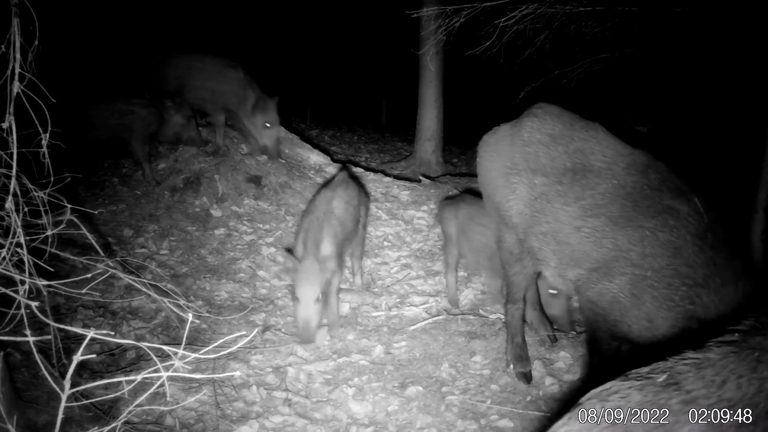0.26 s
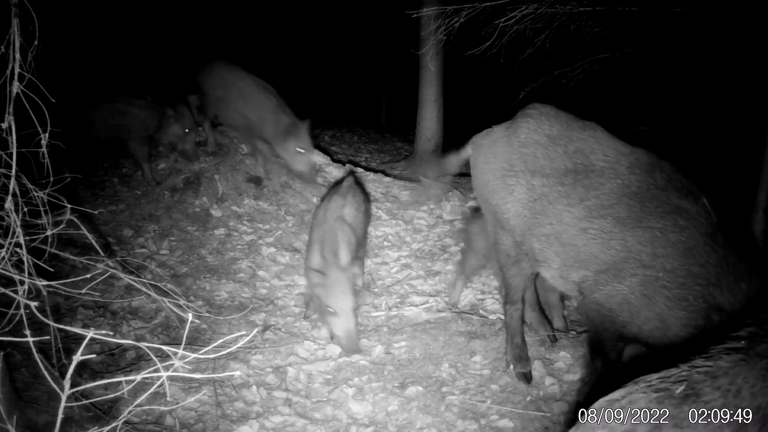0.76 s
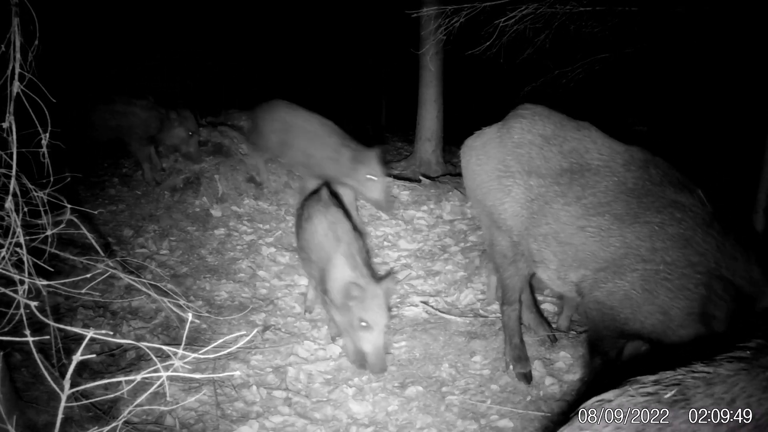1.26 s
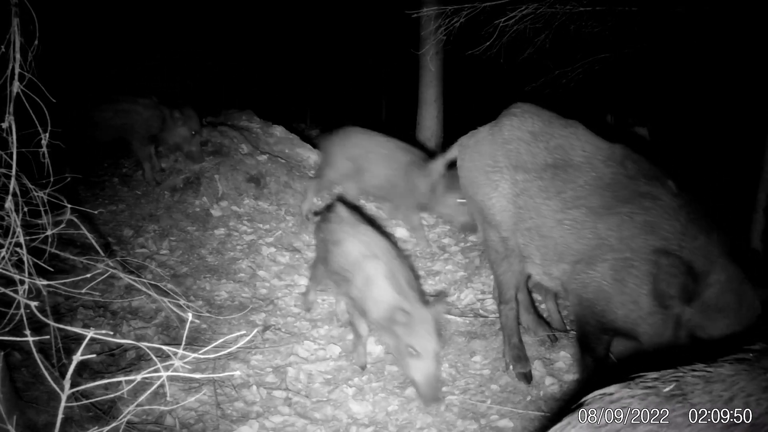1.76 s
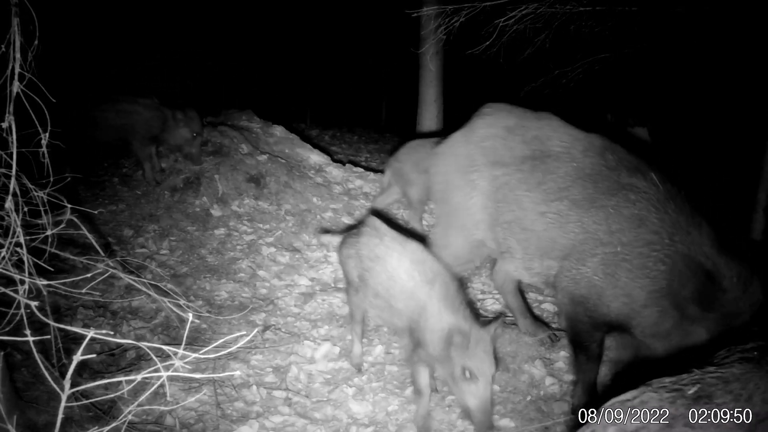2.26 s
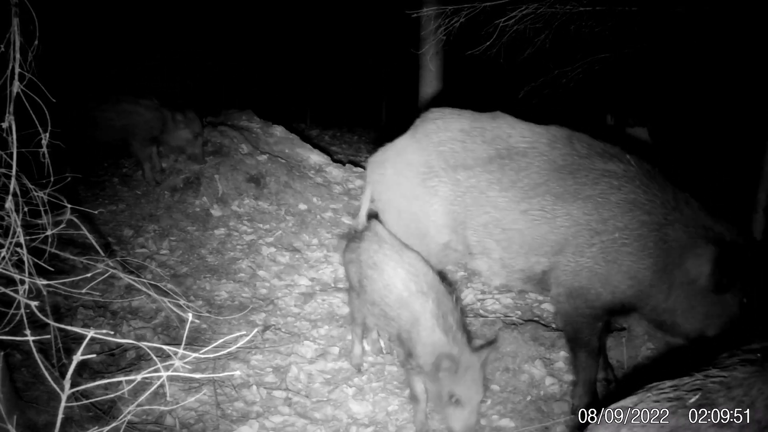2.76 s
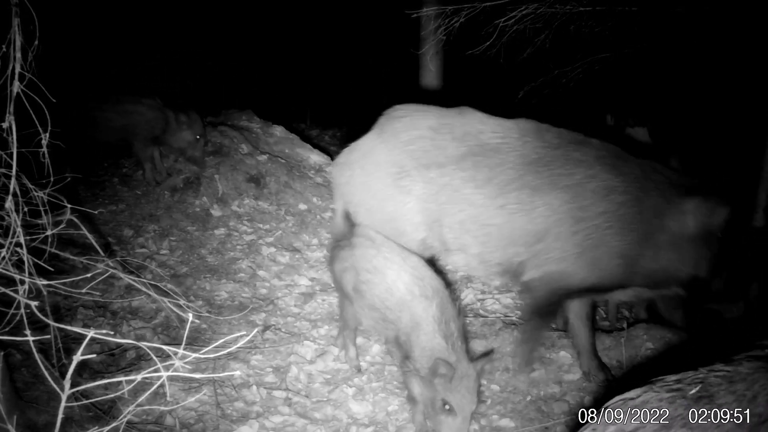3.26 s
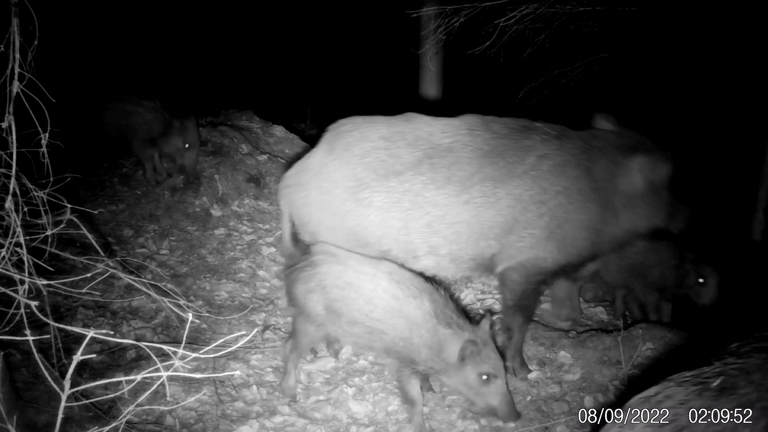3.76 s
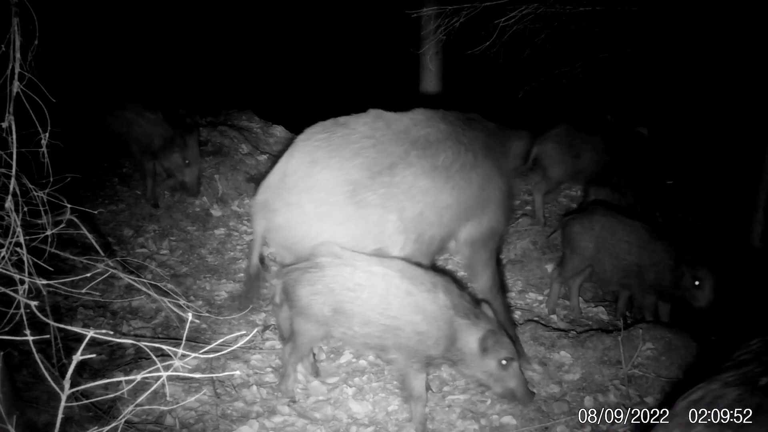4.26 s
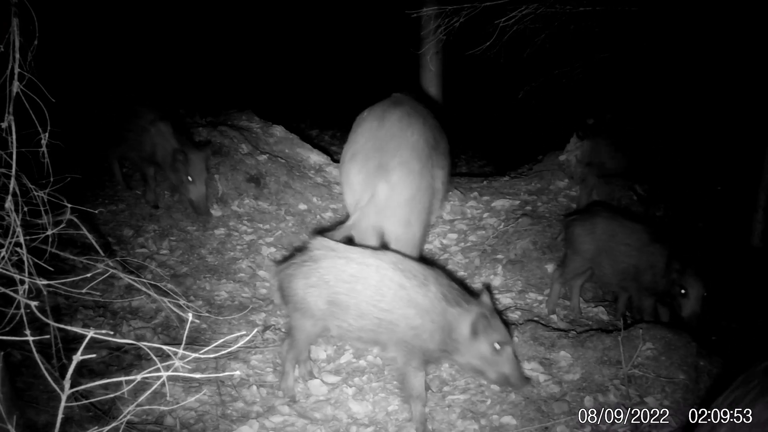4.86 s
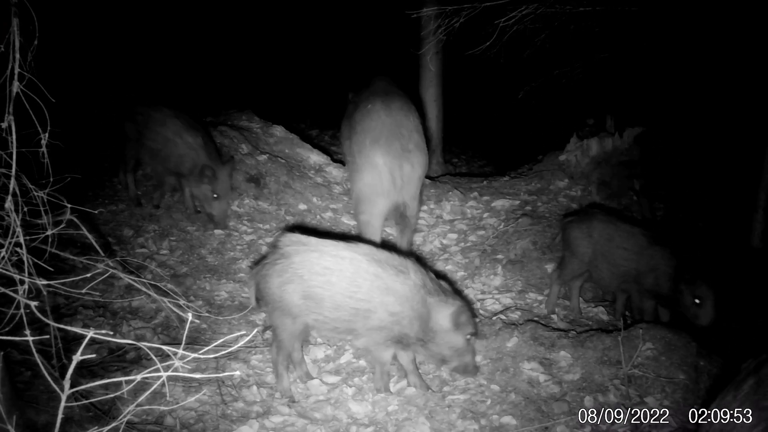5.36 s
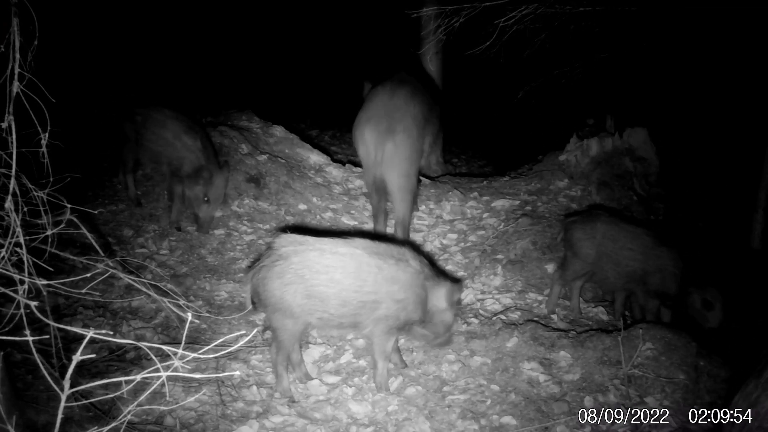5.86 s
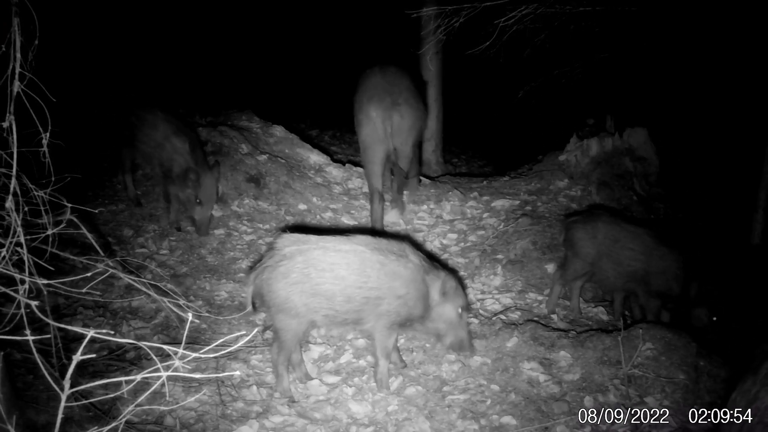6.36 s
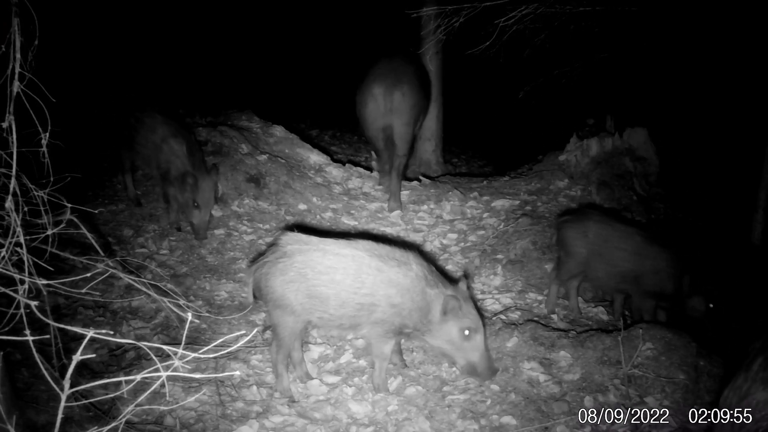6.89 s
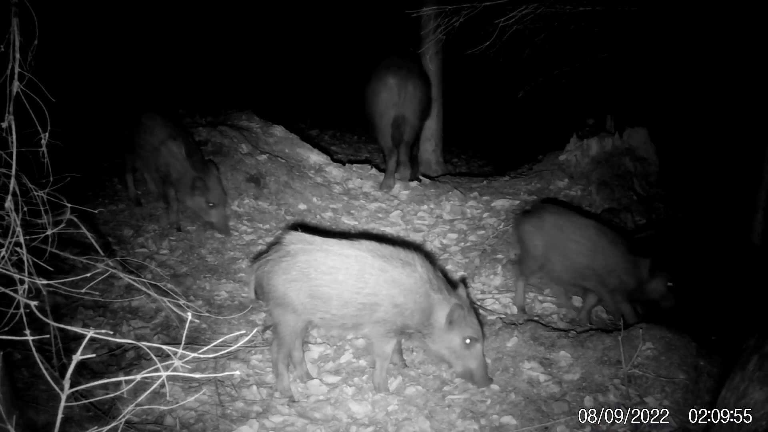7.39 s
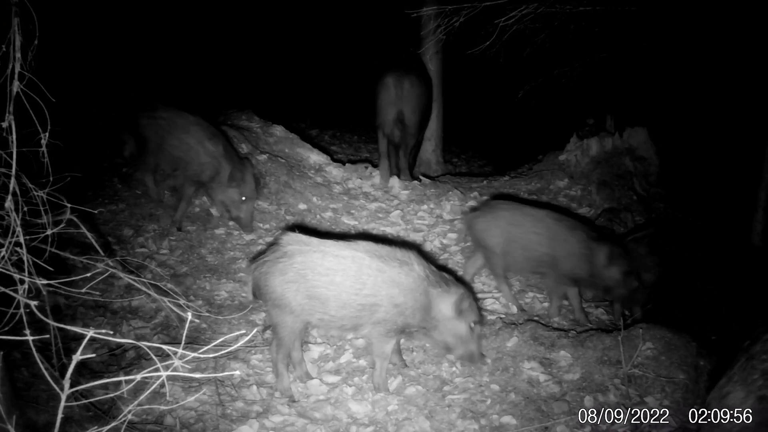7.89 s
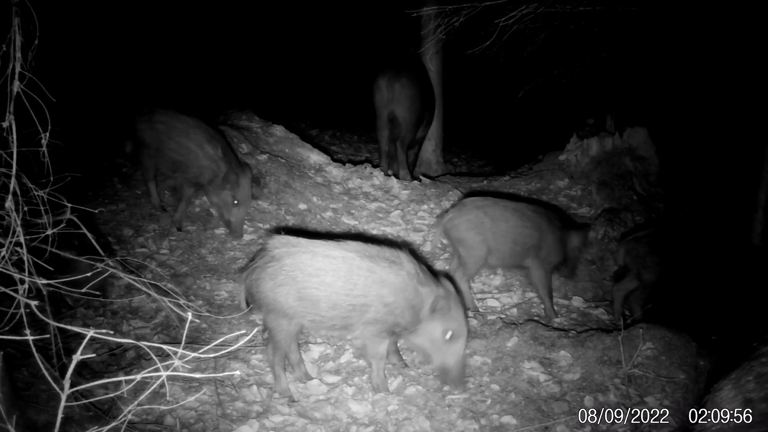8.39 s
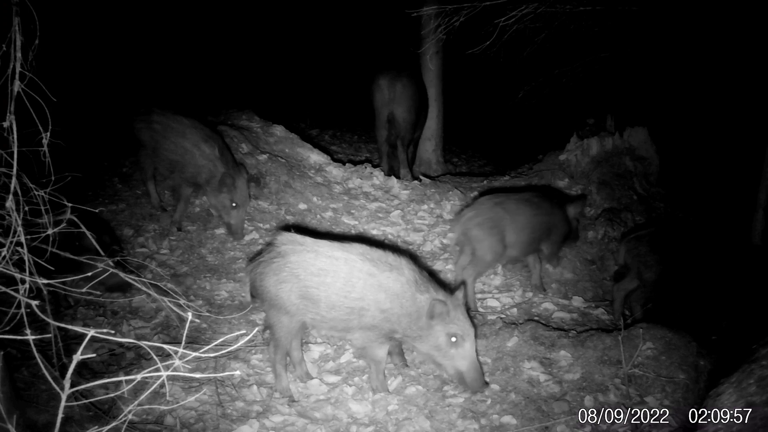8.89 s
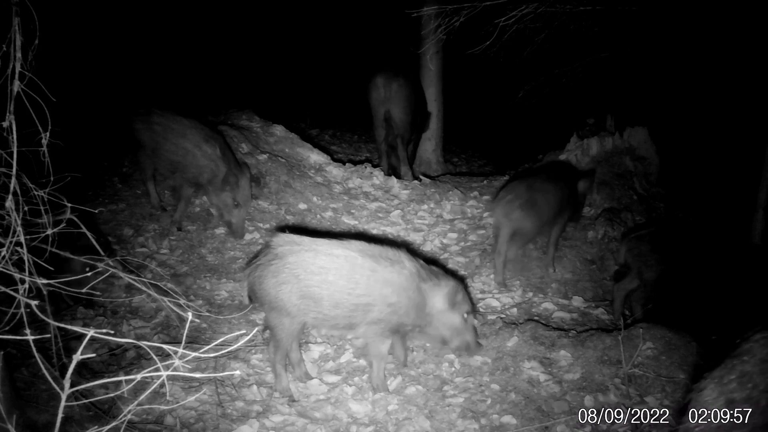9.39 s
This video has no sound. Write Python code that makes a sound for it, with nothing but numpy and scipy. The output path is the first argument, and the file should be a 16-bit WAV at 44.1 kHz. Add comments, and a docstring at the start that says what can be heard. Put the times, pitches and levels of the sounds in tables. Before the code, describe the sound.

Wild boar grunt and bark in short throaty bursts, piglets squeak and whine, and dry leaves rustle and snap underfoot in quiet night woodland.

```python
"""Wild boar in dry leaves

Adults and young grunt in trains of throat slaps and give single barks; piglets whistle and whine.
Each slap rings the throat, while the whistles and whines are sums of sines on gliding pitch paths.
Filtered noise makes rustling leaves, cracking twigs, a snort, snuffling, far grunts and a low rumble.
A small mono microphone adds a steady hiss, and the sound drops out for a moment near the end."""
import sys
import numpy as np
from scipy import signal
from scipy.fft import rfft, irfft, next_fast_len
from scipy.io import wavfile
from scipy.ndimage import uniform_filter1d

SR = 44100
rng = np.random.default_rng(int(sys.argv[2]) if len(sys.argv) > 2 else 0)


def generate_wav(sig):
    """Save sig (samples, or channels by samples) to the path in sys.argv[1] as 16-bit PCM at SR."""
    pcm = np.round(np.clip(np.atleast_2d(sig).T, -1, 1) * 32767).astype(np.int16)
    wavfile.write(sys.argv[1], SR, pcm)


def voltage_ratio(level):
    """Linear amplitude factor for a level in decibels (scalar or array-like)."""
    return 10 ** (np.asarray(level, float) / 20)


N = 425124
T = np.arange(N) / SR

# each shove of a snout or foot through the leaves:
# (peak time [s], time to rise 10 dB [s], time to sink 10 dB [s], level [dB], crispness [dB])
STIRS = [(0.0, .02, 0.022, -43, -2), (.08, 0.064, 0.099, -46, -4), (.21, .06, .05, -49, -3),
         (.29, .2, 0.23, -48, -8), (.59, 0.19, 0.26, -59, -4), (1.15, 0.083, 0.048, -52, -6),
         (1.4, 0.17, 0.11, -60, -11), (1.5, 0.12, 0.091, -54, -3.5), (1.9, .2, .22, -53, -5),
         (2.121, .07, 0.14, -54, 0), (2.3, .2, .13, -61, -15), (2.95, 0.091, 0.27, -56, -4.5),
         (3.141, 0.067, 0.067, -48, -3.5), (3.35, 0.036, .5, -52.5, -5.5), (3.89, 0.059, 0.47, -51, -8),
         (4.15, .3, .3, -56, -3), (4.35, .2, 0.12, -54.5, 5), (4.45, 0.089, 0.13, -50.5, -3),
         (4.55, .1, 0.086, -55.5, 4), (4.67, .2, 0.15, -51.5, -4), (4.91, 0.1, .27, -50, -9),
         (5.23, 0.21, 0.34, -55, 6.5), (5.42, .15, 0.23, -57.5, -4), (5.64, .07, 0.11, -51.5, -4.5),
         (5.849, 0.036, .11, -49.5, -8), (6.15, 0.059, .115, -55.5, -8), (6.42, .045, 0.027, -52, -6),
         (6.74, 0.18, 0.37, -52.5, -6.5), (7.24, .17, 0.053, -53.5, -9), (7.33, 0.082, .33, -52.5, -4),
         (7.68, 0.084, 0.34, -51, -5), (8.24, .5, 0.1, -55, -8), (8.46, .05, 0.21, -52.5, -7),
         (8.75, .09, 0.21, -51, -7), (9.02, 0.071, 0.016, -48.5, -12), (9.19, 0.039, 0.086, -56, 0),
         (9.37, 0.21, 0.26, -55.5, -9), (9.53, 0.21, 0.088, -52, -0.5), (9.64, 0.059, .05, -54, -2)]


def along(points, hz):
    """Level in dB at each frequency of a (Hz, dB) spectrum, straight on a log frequency axis."""
    f, db = np.transpose(points)
    log_hz = np.log(np.maximum(hz, 1))
    return np.interp(log_hz, np.log(f), db, left=db[0] - 10, right=db[-1] - 15.5)


def colour(x, points):
    """Filter by a spectrum and set the rms to 1."""
    n = next_fast_len(len(x))
    hz = np.arange(n // 2 + 1) * SR / n
    y = irfft(rfft(x, n) * voltage_ratio(along(points, hz)), n)[:len(x)]
    return y / np.sqrt(np.mean(y ** 2))


def band(x, order, lo_hz, hi_hz):
    """Let through only the frequencies between two edges."""
    return signal.sosfilt(signal.butter(order, [lo_hz, hi_hz], "band", fs=SR, output="sos"), x)


def walk(rate):
    """A random level that glides to a new value `rate` times a second; its spread is near 1."""
    hold = int(SR / rate)
    steps = np.repeat(rng.standard_normal(N // hold + 1), hold)
    return 1.2 * uniform_filter1d(steps, hold)[:N]


def add(out, s, x):
    """Mix x in at s seconds."""
    i = int(s * SR)
    out[i:i + len(x)] += x[:N - i]


def swells(s, rise_s, sink_s, db, bed_db):
    """Gain of overlapping swells, each climbing and sinking steadily in dB, over a constant bed."""
    power = voltage_ratio(2 * bed_db)
    for at, rise, sink, top_db in zip(s, rise_s, sink_s, db):
        tens_below_top = np.maximum((T - at) / sink, (at - T) / rise)
        power = power + voltage_ratio(2 * (top_db - 10 * tens_below_top))
    return np.sqrt(power)


def slap(throat, chest_db, snout_db, chance):
    """One slap of the vocal folds rings the throat modes, a little differently each time."""
    t = np.arange(3000) / SR
    hz, db, t60 = np.transpose(throat)
    n = len(hz)
    # the chest lifts the lowest modes, the snout the highest
    tone_db = db + chest_db * (hz < 500) + snout_db * (hz > 2400) + 1.5 * chance[:n]
    tone_hz = hz * (1 + .02 * chance[n:2 * n])
    ring = voltage_ratio(tone_db) * np.sin(2 * np.pi * tone_hz * t[:, None])
    fade = np.exp(-np.log(1000) * t[:, None] / t60)
    onset = 1 - np.exp(-t / 0.0003)
    air = 1 + uniform_filter1d(rng.standard_normal(len(t)), size=12)  # breath roughens the ring
    return air * onset * (ring * fade).sum(1) / 2


def grunt_trains(rows, throat):
    """A grunt is a train of evenly timed slaps that swells and fades."""
    out = np.zeros(N)
    for first, last, rate_hz, level_db, chest_db, snout_db in rows:
        count = int(round((last - first) * rate_hz)) + 1
        for k, chance in enumerate(rng.standard_normal((count, 20))):
            place = (2 * k + 1) / count - 1  # from -1 to 1 through the train
            swell_db = -4.5 * (place + .2) ** 2  # loudest a little before the middle
            pulse = slap(throat, chest_db, snout_db, chance)
            add(out, first + k / rate_hz, pulse * voltage_ratio(level_db + swell_db + chance[-1]))
    return out


def grunts():
    """Sows, piglets and yearlings grunt, each kind ringing its own throat modes."""
    # grunts: (first pulse [s], last pulse [s], pulse rate [Hz], level [dB], chest [dB], snout [dB])
    sow_rows = [(.3150, .3500, 28.5, -34.5, -12, -15), (1.4975, 1.632, 29.9, -30.5, -0.5, -3),
                (2.0478, 2.166, 42, -36.5, 2, -3), (2.411, 2.541, 30.96, -38.5, 5, -12)]
    piglet_rows = [(1.8640, 1.905, 48.8, -40, 0, 6.5), (2.3285, 2.512, 48.7, -43.5, 0, 6.5),
                   (3.0655, 3.105, 51.8, -48, 0, -10), (3.515, 3.561, 44.1, -47, 0, -10),
                   (4.3561, 4.380, 43.2, -40, 0, -15)]
    yearling_rows = [(1.7829, 1.927, 27.4, -41, -7, 3.1), (3.6093, 3.717, 28, -47.5, 2, 6),
                     (4.829, 4.929, 30.2, -34, -8, 2.5)]
    # throat modes: (frequency [Hz], level [dB], time to fade 60 dB [s])
    sow_throat = [(175, -4.5, 0.032), (532, -11, 0.027), (900, -23, 0.03), (1170, 3, 0.023),
                  (1490, 1, 0.016), (2690, -0.5, 0.024), (3230, 1, 0.02), (3770, -26, 0.029)]
    piglet_throat = [(315, 1.5, 0.037), (623, -5, 0.022), (1300, -3.5, 0.036), (2266, 0, 0.018),
                     (2850, -3, 0.018), (5770, 2, 0.0094), (6200, 9.5, 0.0091), (6800, -8, .008)]
    yearling_throat = [(284, -8, 0.045), (1370, -2.5, 0.029), (1850, 2, 0.018), (2750, 0, 0.015),
                       (3250, 3, 0.017), (3600, 0, 0.017)]
    old = grunt_trains(sow_rows, sow_throat) + grunt_trains(yearling_rows, yearling_throat)
    return old + grunt_trains(piglet_rows, piglet_throat)


def barks():
    """Two sows bark in lone slaps with a longer ring of the throat."""
    # barks: (time [s], level [dB], chest [dB], snout [dB])
    near_rows = [(1.3825, -32.5, 5, 4), (1.7096, -46.5, 10, -15), (1.7410, -28, -0.5, -1.5)]
    side_rows = [(.1650, -33.5, 1, -15), (.4290, -39.5, 7, 4), (2.2115, -38.5, -3, -10),
                 (2.2455, -33.5, -4.5, -2), (7.383, -51, -6, -15)]
    # throat modes: (frequency [Hz], level [dB], time to fade 60 dB [s])
    near_throat = [(273, -7, 0.068), (673, -9.5, 0.07), (1055, -2.5, 0.046), (1210, 2.5, 0.037),
                   (1777, -5, 0.05), (2430, 1, 0.034), (3255, -0.5, 0.042), (4080, -20, 0.027)]
    side_throat = [(342, 2, 0.051), (738, 1.5, 0.034), (1230, 6, 0.052), (1600, -2.5, 0.028),
                   (1900, -5, .04), (2620, -1.5, 0.035), (3650, 1.5, 0.021)]
    out = np.zeros(N)
    for rows, throat in [(near_rows, near_throat), (side_rows, side_throat)]:
        for s, level_db, chest_db, snout_db in rows:
            chance = .5 * rng.standard_normal(20)
            add(out, s, slap(throat, chest_db, snout_db, chance) * voltage_ratio(level_db))
    return out


def calls(paths, voices, middle_hz, db_per_octave):
    """Gain, pitch, phase and traits of gliding calls whose level follows pitch and fades at both ends."""
    attack_s, release_s, edge_db = .006, .025, -6.0  # edge_db: extra level at the very ends
    starts = np.array([path[0][0] for path in paths])
    ends = np.array([path[-1][0] for path in paths])
    s, path_hz = np.transpose(np.vstack(paths))
    sounding = sum((T > start) & (T <= end) for start, end in zip(starts, ends))
    gate = uniform_filter1d(sounding.astype(float), size=400)
    live = np.flatnonzero(gate > 1e-6)  # only the samples in which a call sounds
    t = T[live]

    smooth_hz = uniform_filter1d(np.interp(T, s, path_hz), size=400)[live]
    hz = smooth_hz * (1 + 0.00435 * walk(120)[live])  # the pitch trembles slightly
    phase = 2 * np.pi * np.cumsum(hz) / SR

    lengths = [len(path) for path in paths]
    db, *traits = [np.interp(t, s, np.repeat(trait, lengths)) for trait in np.transpose(voices)]
    own = np.searchsorted(ends[:-1], t)  # the call that sounds now
    attack = (t - starts[own]).clip(0) / attack_s
    release = (ends[own] - t).clip(0) / release_s
    db = db + db_per_octave * np.log2(hz / middle_hz)
    db = db + edge_db * np.clip(1 - np.minimum(attack, release), 0, 1)
    gain = gate[live].clip(0, 1) * np.sqrt(2) * voltage_ratio(db)
    return live, gain, hz, phase, traits


def whistles():
    """Thin squeaks, each a sine with a weak second partial and a third that varies."""
    # pitch path of each squeak: (time [s], pitch [Hz])
    paths = [
        [(.105, 1500), (.13, 2080), (.16, 2090)],
        [(.268, 2250), (.292, 2320)],
        [(.3, 1548), (.325, 2000), (.37, 1870), (.4, 2000), (.435, 1960), (.46, 1800), (.5, 2060)],
        [(.76, 1550), (.79, 2080), (.82, 2180)],
        [(5.09, 1600), (5.115, 2000), (5.14, 2020)],
        [(5.44, 1450), (5.46, 1900), (5.49, 2050)],
        [(5.58, 1940), (5.63, 2020)],
        [(6.89, 1900), (6.935, 1710), (6.965, 2020), (6.99, 2140)],
        [(7.14, 1650), (7.17, 1800), (7.215, 1615)],
        [(7.23, 1508), (7.28, 1950), (7.335, 2120), (7.36, 1750), (7.41, 1660)],
        [(7.45, 1680), (7.53, 1570)],
    ]
    # one row per squeak: (level at the middle pitch [dB], third partial over the first there [dB])
    voices = [(-49.5, 1.5), (-57, -18), (-54.5, 4.5), (-56.5, 1), (-54, 3), (-57, 4.5), (-60, -8),
              (-51.5, -17), (-55, -12), (-56, -4), (-58.5, -8)]
    middle_hz = 2000
    # harder blown is higher and louder: 8 dB per octave
    live, gain, hz, phase, (third_db,) = calls(paths, voices, middle_hz, 8.0)
    third_db = third_db - 12.0 * np.log2(hz / middle_hz)  # stands out most low in a glide
    tone = np.sin(phase) + voltage_ratio(-16.0) * np.sin(2 * phase) + voltage_ratio(third_db) * np.sin(3 * phase)
    out = np.zeros(N)
    out[live] = gain * tone * voltage_ratio(3.3 * walk(60)[live])  # the level flickers
    return out


def whines():
    """A stack of partials heard through the mouth; each partial flickers on its own."""
    # pitch path of each wavering whine: (time [s], pitch [Hz])
    paths = [
        [(.228, 1750), (.24, 1460), (.255, 1500), (.27, 1340), (.29, 1400)],
        [(5.7, 1140), (5.72, 1000), (5.738, 950), (5.77, 1170)],
        [(5.985, 1103), (6.015, 955), (6.035, 1020), (6.07, 1300)],
        [(6.1, 1210), (6.135, 1010), (6.165, 1090), (6.19, 1206), (6.23, 1250)],
        [(7.13, 1290), (7.19, 1384), (7.23, 2000), (7.26, 1850), (7.3, 1316), (7.325, 1190)],
        [(7.345, 1270), (7.375, 1390), (7.395, 1300), (7.415, 1036), (7.45, 1453), (7.47, 1870), (7.49, 1900),
         (7.51, 1750)],
        [(7.54, 1260), (7.56, 1186), (7.58, 1260), (7.63, 1257), (7.65, 1357), (7.68, 1340), (7.71, 1430),
         (7.74, 1390), (7.79, 1084), (7.86, 1257)],
        [(8.38, 1340), (8.41, 1234), (8.44, 1240)],
        [(8.46, 1300), (8.52, 1260), (8.57, 1375), (8.63, 1250), (8.69, 1330), (8.72, 1043)],
        [(8.76, 1040), (8.79, 1135), (8.81, 1080)],
        [(9.27, 1167), (9.293, 1450), (9.305, 1600), (9.328, 1330)],
        [(9.332, 1230), (9.35, 1004), (9.368, 1130)],
        [(9.372, 1160), (9.385, 1220), (9.4, 1450), (9.42, 1266)],
        [(9.46, 1406), (9.48, 1180), (9.5, 1120), (9.52, 1290)],
        [(9.522, 1310), (9.528, 1370), (9.545, 1695), (9.57, 1314)],
    ]
    # one row per whine: (level at the middle pitch [dB], mouth centre [Hz],
    # how sharply the mouth picks partials [factor])
    voices = [(-53, 5900, 3), (-55, 5800, 1.6), (-63.5, 5100, 1.6), (-60.5, 5500, 1.4), (-60, 5200, 1.8),
              (-57, 5500, 1.9), (-58.5, 4940, 1.5), (-60, 4400, 1.6), (-61, 4600, 1.0), (-56, 4500, 2.2),
              (-56, 4100, 2), (-56, 4200, 3), (-61, 4000, 2), (-54, 4900, 3), (-53, 4500, 3)]
    # mouth resonance: (partial's frequency over mouth centre [ratio], level [dB])
    mouth = [(.2, -22), (.55, -15), (.7, -6), (.85, -1), (1, 0), (1.25, -2), (1.5, -9), (2.2, -18)]
    # the voice thins as it is squeezed upward: -8 dB per octave from 1250 Hz
    live, gain, hz, phase, (mouth_hz, focus) = calls(paths, voices, 1250, -8)
    place, mouth_db = np.transpose(mouth)
    out = np.zeros(N)
    for k in range(1, 10):
        partial_db = focus * np.interp(k * hz / mouth_hz, place, mouth_db) + 3.5 * walk(60)[live]
        out[live] += gain * voltage_ratio(partial_db) * np.sin(k * phase + k * k)
    return out


def rustle():
    """Leaf ticks of uneven size over a smooth scrape; each frequency band flickers apart."""
    # spectrum of dry leaves: (frequency [Hz], level per Hz [dB])
    leaf_spectrum = [(1470, -32), (2500, -21), (4010, -17.5), (4340, -9.5), (5530, -3), (8010, -10),
                     (9550, -20), (10600, -18), (12500, -18), (16200, -74), (22000, -120)]
    ticks_per_s, tick_spread_db = 570.0, 4.0
    bed_db, bed_crisp_db = -70, -9  # the steady rustle under the shoves
    s, rise_s, sink_s, db, crisp_db = np.transpose(STIRS)
    bands = []
    for lo_hz, hi_hz in [(1500, 5200), (5200, 7000), (7000, 12000)]:
        tick_size = voltage_ratio(tick_spread_db * rng.exponential(size=N).clip(0, 3)) * rng.standard_normal(N)
        ticks = (rng.random(N) < ticks_per_s / SR) * tick_size
        # each tick frays for about a millisecond
        ticks = signal.lfilter([1], [1, -.97], abs(ticks)) * rng.standard_normal(N)
        scrape = colour(rng.standard_normal(N), leaf_spectrum)
        leaves = scrape + colour(ticks, leaf_spectrum)
        bands.append(band(leaves, 3, lo_hz, hi_hz) * voltage_ratio(1.43 * walk(14)))
    body, crisp = bands[0] + bands[1], bands[2]
    body = body / body.std() * swells(s, rise_s, sink_s, db, bed_db)
    crisp = crisp / crisp.std() * swells(s, rise_s, sink_s, db + crisp_db, bed_db + bed_crisp_db)
    return (body + crisp) * voltage_ratio(1.5 * walk(25))


def cracks():
    """A twig or leaf snaps in a short bright burst with a duller thud and a quiet tail of debris."""
    # clear cracks: (time [s], snap peak [dB], centre frequency [Hz], thud under the snap [dB])
    clear = [(0.1136, -30, 6200, -7), (0.1946, -34, 7700, -31), (0.2024, -29, 5900, -26),
             (1.1248, -42, 5780, -18), (1.4858, -39, 3360, -6), (2.08, -34, 6000, -18),
             (2.1276, -39, 6000, -8), (2.278, -36, 5270, -24), (3.141, -31, 5800, -11),
             (3.3277, -34, 5600, -31), (3.4166, -33.5, 6140, -27), (3.684, -36, 5560, -22),
             (4.2945, -36, 5730, -1), (4.555, -32.5, 6100, -6), (4.631, -36, 5630, -8),
             (4.8888, -35.5, 5650, -5), (5.1742, -33, 8070, -15), (5.2709, -26.5, 8110, -17),
             (5.6082, -35, 5590, -17), (5.6495, -37.5, 5360, -3), (5.773, -44, 6020, -20),
             (6.2741, -42, 6800, -19), (6.508, -39, 5570, -25), (6.5427, -38, 5900, -22),
             (6.5954, -35, 5640, -21), (6.624, -33.5, 5470, -15), (6.691, -30.5, 6600, -31),
             (7.2746, -28, 7000, -12), (7.5488, -33.5, 4840, -24), (7.631, -31, 5630, -23),
             (7.796, -35, 5300, -25), (8.112, -33.5, 5730, -33), (8.3185, -18, 5200, -14),
             (8.3194, -15.5, 4870, -13), (8.4737, -38, 5480, -24), (8.735, -37, 7000, -18),
             (8.5566, -24, 5750, -19), (8.84, -37, 4910, -7), (8.8495, -35, 4840, -1),
             (9.0021, -33, 5470, -13), (9.1646, -19, 5320, -16)]
    snap_s, tail_s, tail_db = 0.0017, 0.018, -17.0
    top_db = -11.5  # extra treble, against the snap
    small = []
    for _ in range(36):  # small cracks fall soon after the peak of a random shove
        s = rng.choice(np.transpose(STIRS)[0]) + .15 * rng.random()
        a, b, c = rng.standard_normal(3)
        if s < T[-1]:
            small.append((s, -44 + 3.8 * a, 6200 * (1 + .07 * b), -20 + 4.4 * c))
    out, t = np.zeros(N), np.arange(2400) / SR
    for s, peak_db, hz, thud_db in clear + small:
        noise = rng.standard_normal((2, len(t)))
        shape = np.exp(-t / snap_s) + voltage_ratio(tail_db) * np.exp(-t / tail_s)
        split = noise[0] * shape + 3.4 * (t == 0)  # the first fibre breaks hardest
        bright = band(split, 2, 0.79 * hz, min(1.263 * hz, 10500))
        top = band(split, 2, 6500, 9800)
        bright = bright + voltage_ratio(top_db) * top * bright.std() / top.std()
        dull = band(noise[1] * np.exp(-t / snap_s), 1, 1000, 3000)
        thud = voltage_ratio(thud_db) * dull * bright.std() / dull.std()
        add(out, s, voltage_ratio(peak_db) * (bright + thud) / abs(bright).max())
    return out


def snort():
    """One smooth blast of air through the nostrils: noise that swells and fades."""
    # the blast: (centre time [s], half width [s], level [dB])
    s, width_s, db = (5.245, 0.07, -41)
    # spectrum of the blown air: (frequency [Hz], level per Hz [dB])
    air_spectrum = [(710, -46), (1200, -15), (1600, -9.5), (3270, -5), (4450, -9.5), (8010, -1.5),
                    (9990, -5), (12000, -34), (15600, -63), (22000, -120)]
    puff = np.exp(-.5 * ((T - s) / width_s) ** 2)
    return colour(rng.standard_normal(N), air_spectrum) * voltage_ratio(db) * puff


def snuffling():
    """Airy breath noise of the animals, drifting in level."""
    # snuffling: (time [s], level [dB])
    levels = [(0.0, -58.5), (.43, -59), (.91, -59.5), (1.4, -63.5), (1.82, -61), (2.4, -60), (2.74, -63.5),
              (3.14, -60.5), (3.81, -64), (4.48, -59), (4.75, -63.5), (5.29, -57), (5.5, -63), (7.1, -65),
              (7.33, -61), (8.06, -63.5), (8.73, -60.5), (9.13, -61.5), (9.45, -60), (9.64, -58)]
    # spectrum of the breath: (frequency [Hz], level per Hz [dB])
    breath_spectrum = [(400, -6.5), (800, -0.5), (1250, 0), (2100, -0.5), (3000, -4.5), (4200, -13.5)]
    s, db = np.transpose(levels)
    breath = colour(rng.standard_normal(N), breath_spectrum) * voltage_ratio(1.8 * walk(12))
    return breath * voltage_ratio(np.interp(T, s, db))


def far_grunts():
    """Far grunts murmur as low noise puffed at an uneven pulse rate."""
    # far grunts: (peak time [s], time to sink 10 dB [s], level [dB])
    rows = [(.02, 0.1, -62), (.33, .2, -57.5), (.45, .25, -55.5), (.91, .15, -59), (1.42, 0.2, -64),
            (1.82, 0.15, -54.5), (2.17, 0.23, -57.5), (2.49, .3, -59), (3.14, 0.34, -60.5),
            (3.6, 0.5, -63.5), (4.42, 0.4, -63), (4.97, .5, -65), (5.85, .15, -63), (6.2, .4, -64.5),
            (7.95, .5, -68.5), (8.75, 0.9, -65), (9.62, 0.1, -65)]
    # spectrum of the murmur: (frequency [Hz], level per Hz [dB])
    murmur_spectrum = [(40, -21), (90, -7.5), (160, -2.5), (280, -0.5), (420, -3.5), (700, -13)]
    peak_s, sink_s, db = np.transpose(rows)
    pulse_hz = 30.04 * (1 + 0.17 * walk(5))
    cycle = np.cumsum(pulse_hz / SR) % 1
    puffs = .3 + np.exp(-cycle / 0.35)  # each puff starts hard and dies away
    murmur = colour(rng.standard_normal(N) * puffs, murmur_spectrum) * voltage_ratio(2.5 * walk(12))
    return murmur * swells(peak_s, 0.82 * sink_s, sink_s, db, -78)  # rises a little faster than it sinks


def rumble():
    """A dull low noise under everything, perhaps heavy bodies treading the ground."""
    # rumble: (time [s], level [dB])
    levels = [(0, -70), (1.9, -69), (2.8, -76), (4.4, -77), (5.0, -73), (9.64, -80)]
    s, db = np.transpose(levels)
    low_noise = colour(rng.standard_normal(N), [(25, -5), (60, 2), (110, -7)])
    return low_noise * voltage_ratio(np.interp(T, s, db) + 2.0 * walk(8.8))


def trunk_scatter(near):
    """Trunks scatter the near sounds back as a short, faint, fading wash."""
    t = np.arange(4000) / SR
    echoes = rng.standard_normal(len(t)) * np.exp(-t / 0.021) * (t > .004)
    echoes = echoes / np.sqrt(np.sum(echoes ** 2))
    return voltage_ratio(-20) * signal.fftconvolve(near, echoes)[:N]


def scene():
    """All animals and leaves, the same in both channels."""
    throats = grunts() + barks()
    throats = signal.sosfilt(signal.butter(2, 90, "high", fs=SR, output="sos"), throats)
    near = throats + whistles() + whines() + cracks()
    near = near + trunk_scatter(near)
    mix = near + rustle() + snort() + snuffling() + far_grunts() + rumble()
    return np.tile(mix, (2, 1))


def microphone_hiss():
    """Steady coloured noise of the microphone."""
    # spectrum of the hiss: (frequency [Hz], level per Hz [dB])
    hiss_spectrum = [(15, -40), (25, -5), (100, -5), (233, -1), (582, -3), (1340, -2.5), (2920, -17),
                     (3720, -7), (5720, -2.5), (7900, -8.5), (10300, -23), (12200, -30.5), (15500, -32)]
    return voltage_ratio(-59.5) * colour(rng.standard_normal(N), hiss_spectrum)


def low_pass(x):
    """Removes everything above the highest recorded frequency."""
    return signal.sosfilt(signal.butter(12, 15630, fs=SR, output="sos"), x)


def record(dry):
    """Mono microphone with a steep treble limit and steady hiss; the sound drops out for a moment."""
    # dropout: (start time [s], end time [s])
    dropout_start, dropout_end = (9.574, 9.584)
    treble_limit = signal.cheby2(6, 45, 12640, fs=SR, output="sos")  # 45 dB down from 12640 Hz up
    heard = signal.sosfilt(treble_limit, dry) + microphone_hiss()
    gap = uniform_filter1d(((T > dropout_start) & (T < dropout_end)).astype(float), 60)
    mix = heard * (1 - 1.008 * gap)  # a very faint, flipped trace is left in the gap
    return low_pass(mix)


dry = scene()
out = record(dry)
generate_wav(out)
```